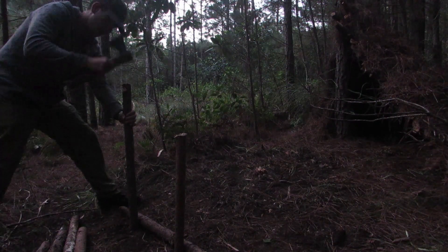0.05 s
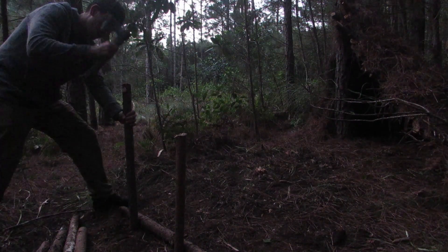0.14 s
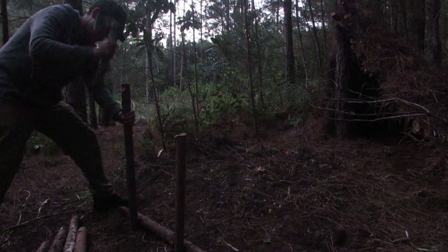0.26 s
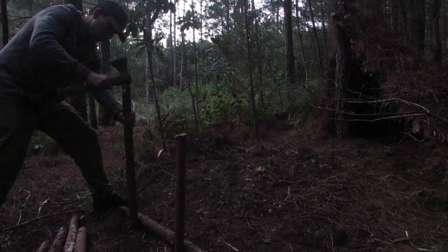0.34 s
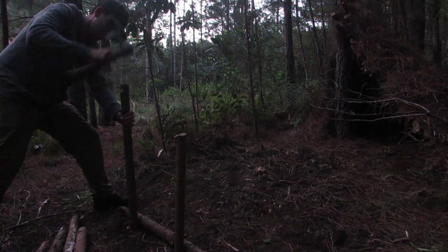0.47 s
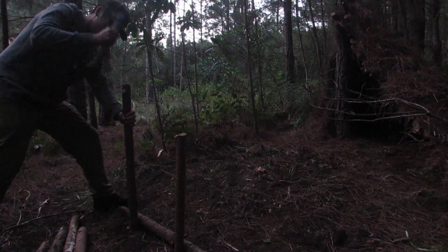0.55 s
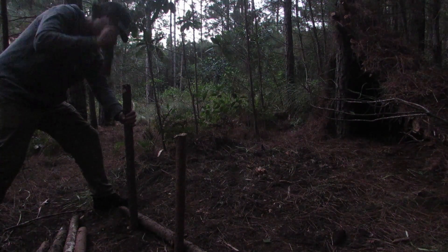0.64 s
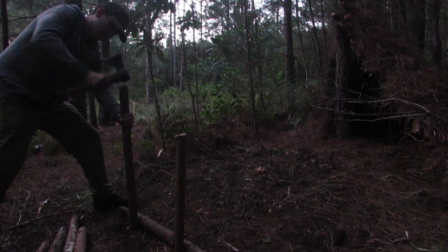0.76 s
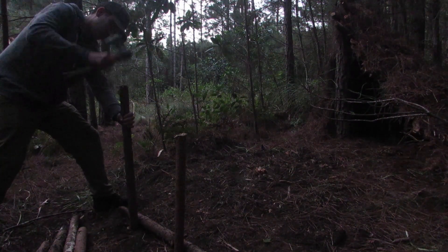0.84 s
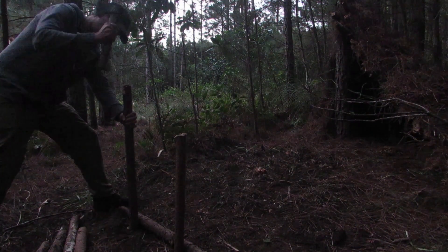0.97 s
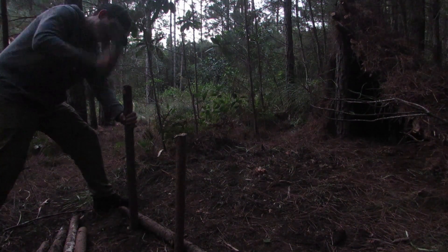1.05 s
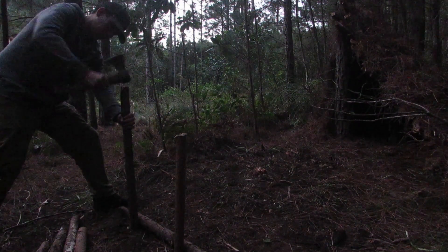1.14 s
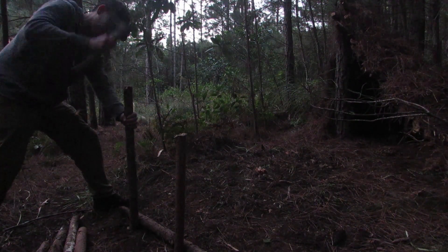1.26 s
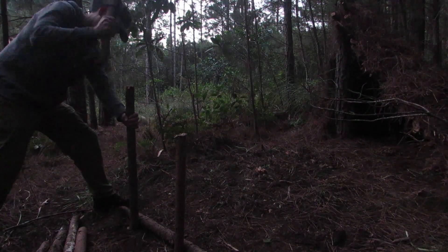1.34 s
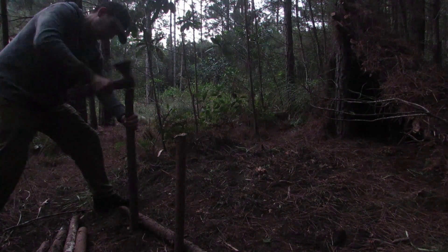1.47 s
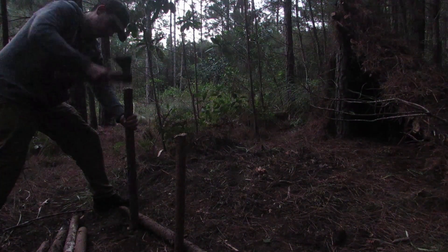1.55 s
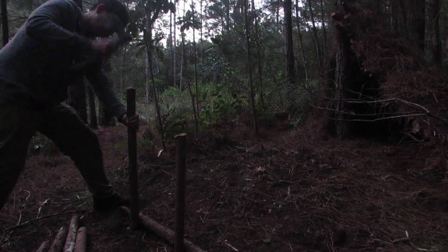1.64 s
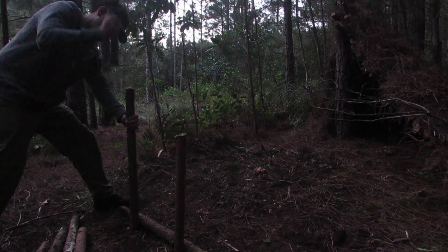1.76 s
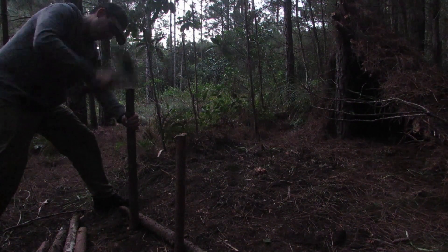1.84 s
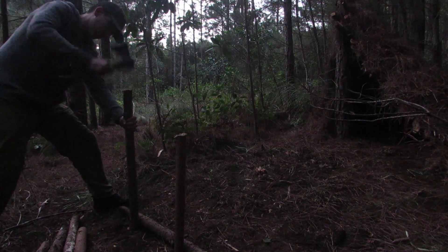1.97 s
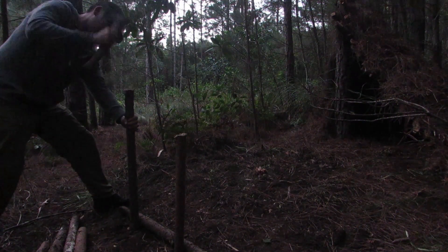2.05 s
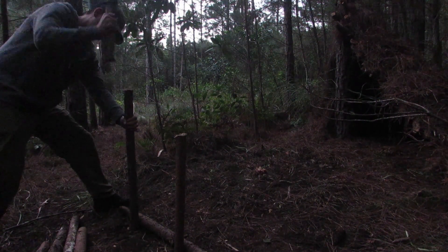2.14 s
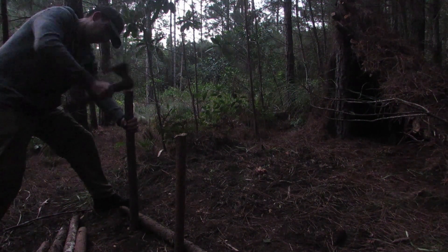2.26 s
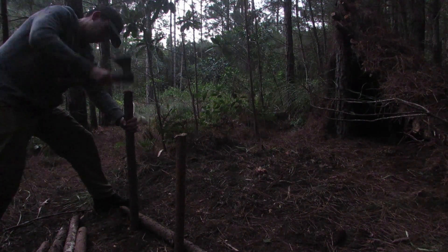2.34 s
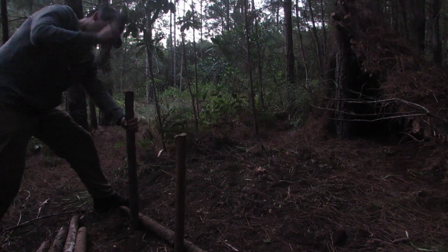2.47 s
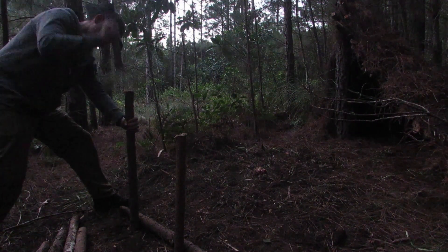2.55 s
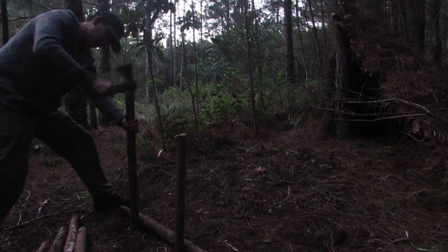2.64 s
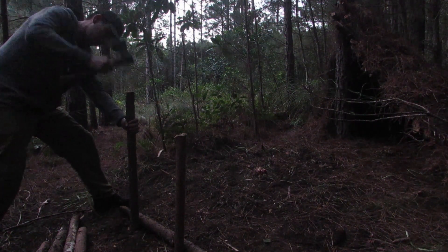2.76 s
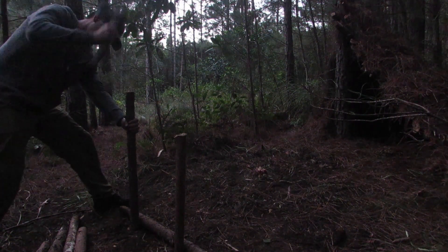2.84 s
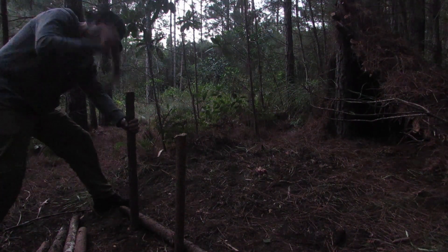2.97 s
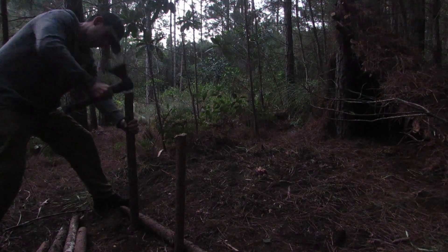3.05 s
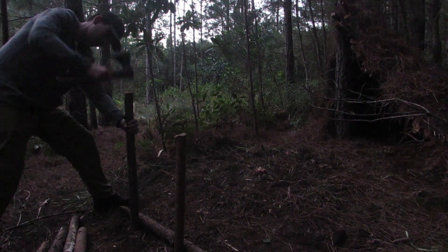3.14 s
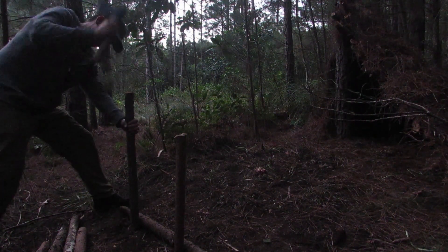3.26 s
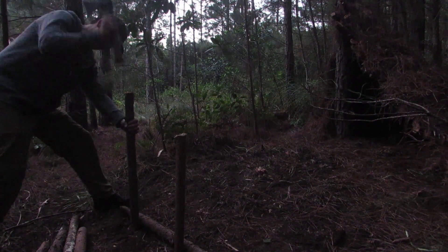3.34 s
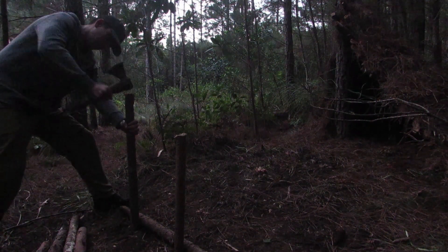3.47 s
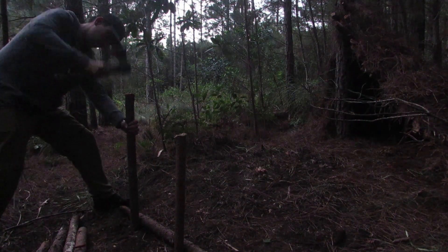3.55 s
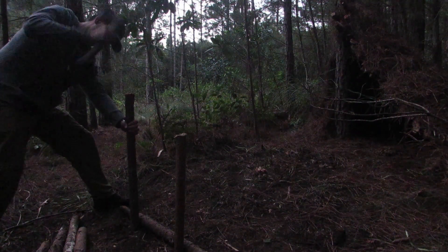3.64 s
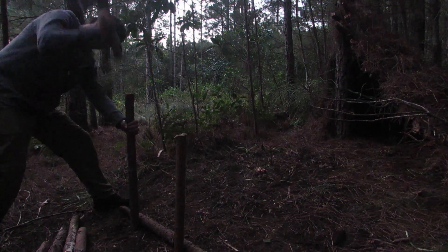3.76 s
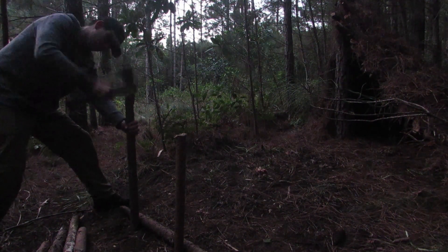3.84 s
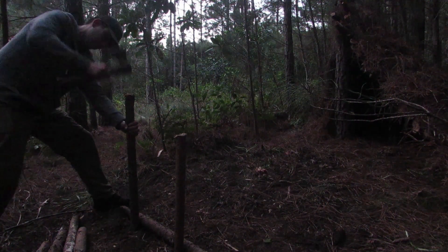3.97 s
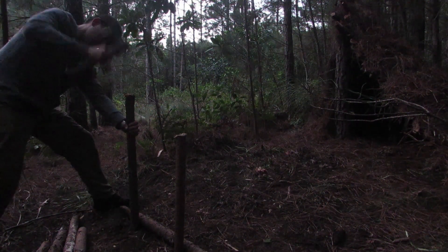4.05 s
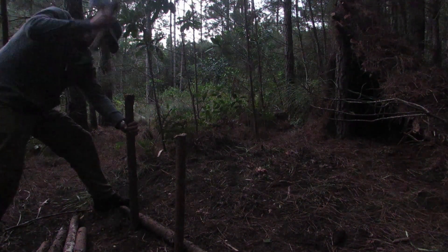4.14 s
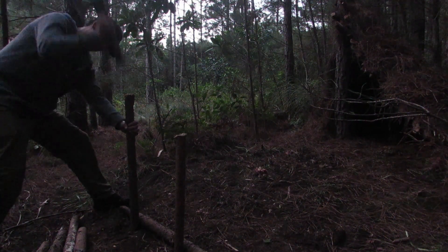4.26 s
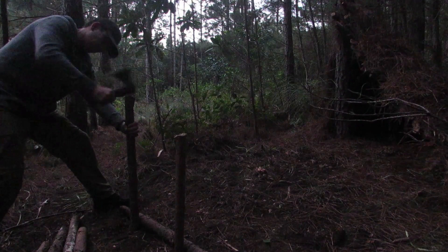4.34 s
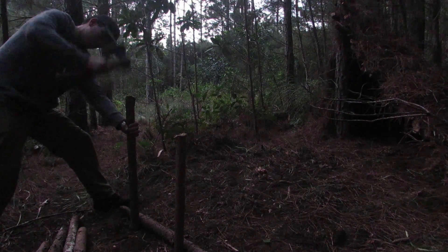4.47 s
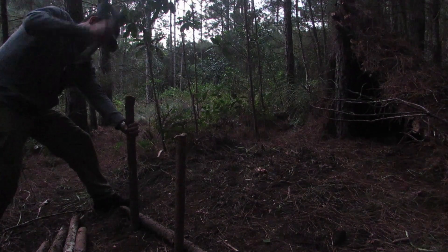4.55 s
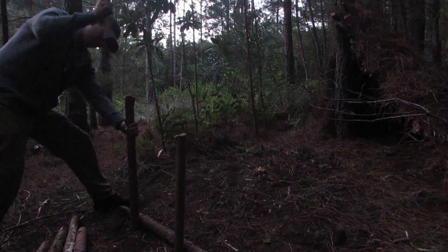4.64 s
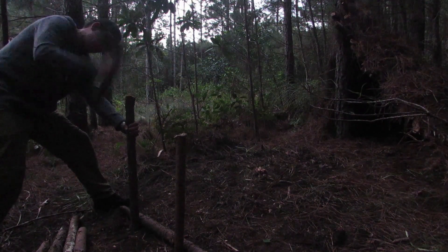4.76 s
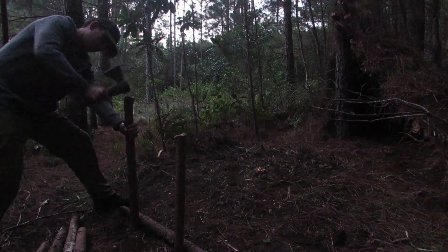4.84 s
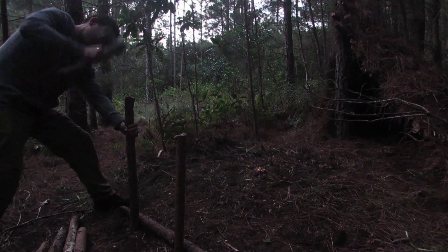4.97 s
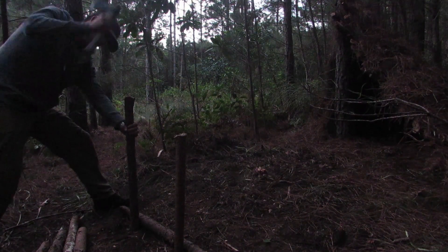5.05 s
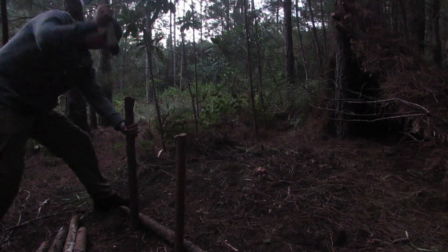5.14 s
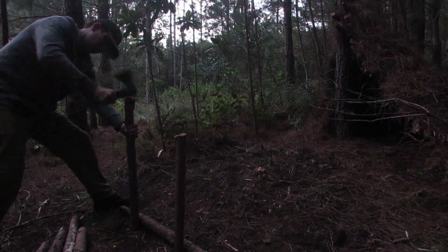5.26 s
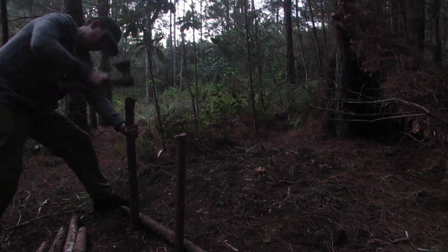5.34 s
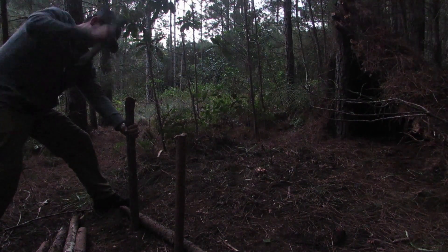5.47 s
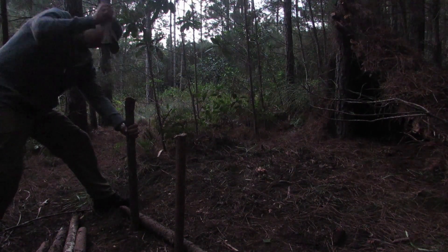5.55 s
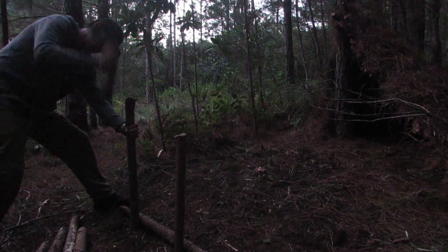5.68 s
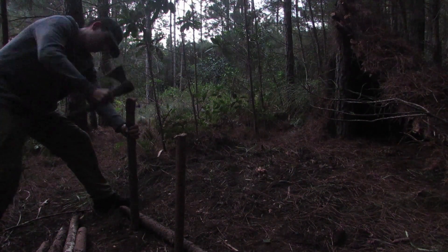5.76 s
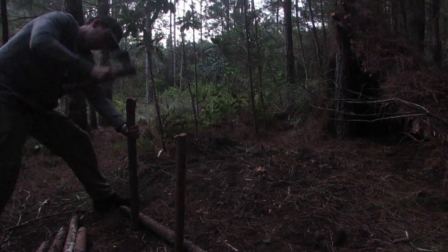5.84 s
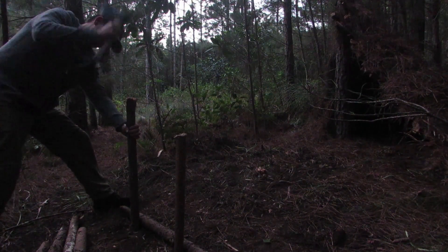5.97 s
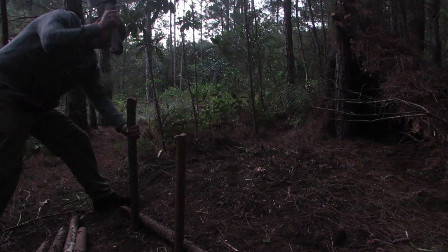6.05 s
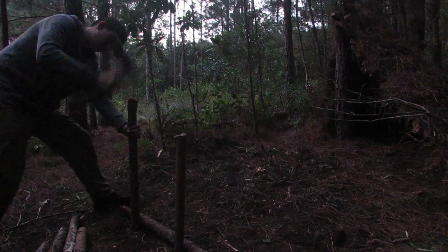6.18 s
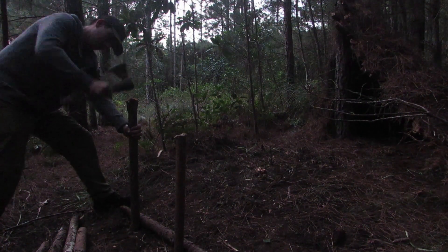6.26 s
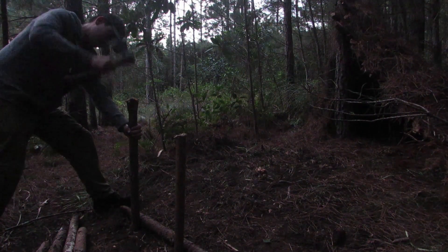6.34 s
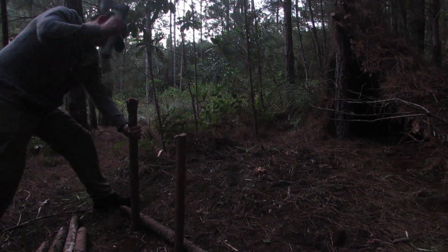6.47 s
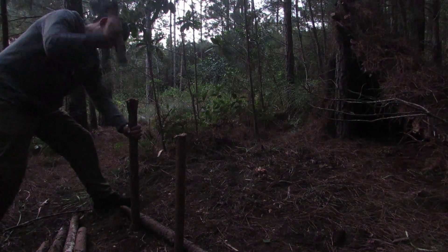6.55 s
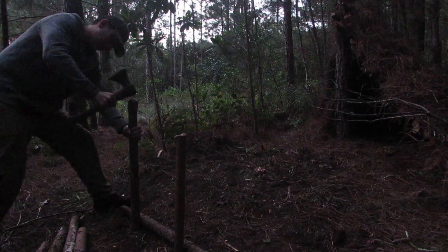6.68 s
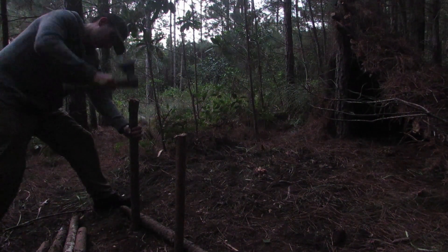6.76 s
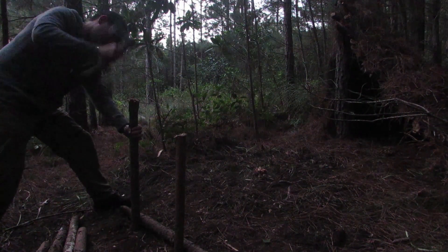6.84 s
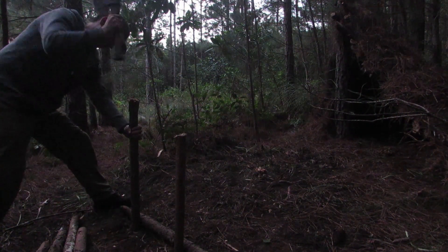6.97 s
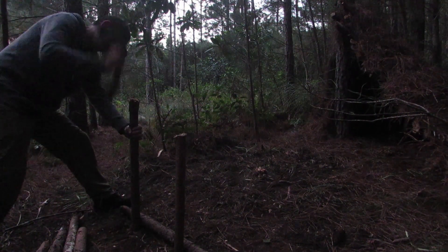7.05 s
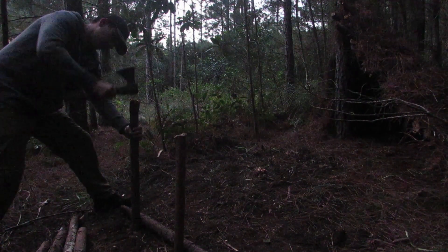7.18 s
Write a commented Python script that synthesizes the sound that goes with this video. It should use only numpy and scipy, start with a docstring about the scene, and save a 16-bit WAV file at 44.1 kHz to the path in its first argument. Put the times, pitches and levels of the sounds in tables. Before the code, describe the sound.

In a quiet forest, a stake is hammered into earth at a steady, slightly slowing pace. Early hits are bright and clacky with crunching wood; later ones are duller, with a firmer, falling thud. Bark snaps, needles crackle faintly, and one tiny bird whistle comes past the middle. A low engine hum and air noise lie behind, with a very faint high electronic whine, heard by a close stereo microphone.

```python
"""Hatchet driving a stake in a forest

A hatchet drives a wooden stake into soil with seventeen blows: crushed-fibre noise, damped wood modes,
a faint head ring, a pitch-falling thud set by the soil's grip and a deep shove that weakens.
Trunks and litter scatter the blows as decaying noise; bark ticks and needles crackle as short noise bursts.
A bird calls once as a wavering sine, over noise for drone and rustle, an engine's firing lines and a thin whine."""
import sys
import numpy as np
from scipy import signal
from scipy.fft import rfft, irfft
from scipy.io import wavfile
from scipy.ndimage import uniform_filter1d

SR = 44100
rng = np.random.default_rng(int(sys.argv[2]) if len(sys.argv) > 2 else 0)


def master(y):
    """Save y as 16-bit WAV."""
    cut = np.clip(np.atleast_2d(y).T, -1, 1)
    pcm = np.round(cut * 32767)  # scale
    wavfile.write(sys.argv[1], SR, pcm.astype(np.int16))


N = 317961
TIME = np.arange(N) / SR
BLOW_TIME = np.arange(8192) / SR
LEVEL_SPAN_S = 0.01


def amp(db):
    """Decibels to gain."""
    return 10 ** (np.asarray(db) / 20)


def evened(x):
    """Scales to rms 1."""
    return x / np.sqrt(np.mean(x ** 2) + 1e-20)


def burst(x, db):
    """Scales a short sound so that its energy, spread over LEVEL_SPAN_S, has this level."""
    return amp(db) * x * np.sqrt(LEVEL_SPAN_S * SR / (np.sum(x ** 2) + 1e-20))


def read(points, hz):
    """Interpolates a (frequency, value) table on a log-frequency axis."""
    f, value = np.transpose(points)
    return np.interp(np.log(hz + 1), np.log(f + 1), value)


def add(mix, start_s, sound):
    """Mixes a sound in at start_s, cut at the end of the mix."""
    part = mix[..., max(round(start_s * SR), 0):][..., :sound.shape[-1]]
    part += sound[..., :part.shape[-1]]


def noise(spectrum, size):
    """Gaussian noise of rms 1, shaped by a (frequency, dB) table."""
    shape = amp(read(spectrum, np.fft.rfftfreq(size, 1 / SR)))
    white = rfft(rng.standard_normal(size))
    return evened(irfft(white * shape, size))


def drift(rate_hz):
    """Smooth random drift of rms 1: noise under a Gaussian low-pass."""
    lowpass = np.exp(-(np.fft.rfftfreq(N, 1 / SR) / rate_hz) ** 2)
    return evened(irfft(rfft(rng.standard_normal(N)) * lowpass, N))


# background before trim: (time [s], drone level [dB], rustle level [dB])
BACKGROUND_LEVELS = [(0.0, -45.5, -59.5), (0.48, -50, -69.5), (1.84, -57.5, -74.5), (2.04, -60.5, -80),
                     (3.49, -62, -84.5), (4.39, -61.5, -80), (4.61, -62.5, -85.5), (6.42, -58.5, -76),
                     (7.2, -62, -83)]
# noise shapes: (frequency [Hz], relative level [dB per Hz])
DRONE_SPECTRUM = [(20, -22), (45, -4), (70, 3.5), (140, 9), (230, -2), (380, -1), (650, -1), (1000, -7.5),
                  (1600, -18), (2500, -27.5), (4500, -38), (9000, -52)]
RUSTLE_SPECTRUM = [(500, -12), (2500, -6.5), (5000, -4), (9500, -4), (13000, -7.5), (16000, -16)]


def air(drone_trim_db=2.5, rustle_trim_db=1):
    """Far drone and needles rustling in the air: two shaped noises with drifting levels."""
    s, drone_level, rustle_level = np.transpose(BACKGROUND_LEVELS)
    drone_db = drone_trim_db + np.interp(TIME, s, drone_level) + 0.35 * drift(rate_hz=12)
    rustle_db = rustle_trim_db + np.interp(TIME, s, rustle_level) + drift(rate_hz=40)
    drone = amp(drone_db) * noise(DRONE_SPECTRUM, size=N)
    rustle = amp(rustle_db) * noise(RUSTLE_SPECTRUM, size=N)
    return drone + rustle


# engine before trim: (time [s], level [dB])
ENGINE_LEVELS = [(0.0, -41.5), (1.0, -48.5), (1.24, -60.5), (1.76, -56), (1.86, -58.5), (3.85, -54),
                 (4.61, -61), (6.28, -51.5), (7.2, -53)]
# firing lines before wander: (frequency [Hz], relative level [dB])
FIRING_LINES = [(70.3, -5.5), (140.6, 0), (307, -16.5), (380, -14)]


def engine(trim_db=-1, wander=0.0051):
    """A far engine: firing lines share a wandering speed; each drifts in level."""
    clock = np.cumsum(1 + wander * drift(rate_hz=5.4)) / SR
    lines = [amp(db + drift(rate_hz=4)) * np.sin(2 * np.pi * hz * clock) for hz, db in FIRING_LINES]
    return evened(sum(lines)) * amp(trim_db + np.interp(TIME, *np.transpose(ENGINE_LEVELS)))


def whine(whine_hz=15735, above_rustle_db=-13, follow=0.7, beat_hz=17):
    """Camera electronics: a faint beating sine whose level partly follows the rustle table."""
    s, _, rustle_level = np.transpose(BACKGROUND_LEVELS)
    change_db = np.interp(TIME, s, rustle_level - rustle_level[0])
    level_db = rustle_level[0] + above_rustle_db + follow * change_db
    beat = 1 + 0.5 * np.sin(2 * np.pi * beat_hz * TIME)
    return amp(level_db) * beat * np.sin(2 * np.pi * whine_hz * TIME)


def litter(max_peak_db=-60, peak_span_db=8, middle_hz=8000, count=20):
    """Dry needles crackle faintly: ticks of random time, peak and pitch."""
    out = np.zeros(N)
    for when, size, pitch in rng.random((count, 3)):
        sound = tick(max_peak_db - peak_span_db * size, middle_hz * 2 ** (pitch - 0.5))
        add(out, when * N / SR, sound)
    return out


# crushed fibres: (frequency [Hz], relative level [dB])
CRACK_SPECTRUM = [(1500, -28.5), (2500, 7.5), (3600, 4), (5200, -0.5), (6500, -16), (9000, -40)]
CRUNCH_SPECTRUM = [(3500, -36.5), (6000, 0.5), (9000, -3.5), (11500, -6.5), (15000, -16), (17000, -24)]


def fibres(spectrum, full_force_s, decay_s, grain=0.13):
    """Fibres crush as grainy noise: fast onset, slow fall, then a steeper one before full force."""
    t = BLOW_TIME
    grains = np.exp(grain * rng.standard_normal(len(t)))
    onset = 1 - np.exp(-t / 0.0003)
    fall = np.exp(-t / 0.013 - np.maximum(t - full_force_s * 0.24, 0) / decay_s)
    return noise(spectrum, size=len(t)) * grains * onset * fall


def swell(t, rise_s):
    """Heavily damped resonance under a soft push: starts at -rise_s, peaks at 1 at t = 0."""
    u = np.maximum(t / rise_s + 1, 0)
    return u ** 2 * np.exp(2 * (1 - u))


def wood(t, hz, rise_s):
    """One damped stake mode, its envelope peaking at t = 0."""
    return -swell(t, rise_s) * np.sin(2 * np.pi * hz * t)


def pushed(hz, rise_s, full_force_s, touch_db, touch_rise_s=0.00016, touch_s=0.0007):
    """A stake mode is struck twice: at first touch, then with the head's full weight."""
    touch = wood(BLOW_TIME - touch_s, hz, touch_rise_s)
    return wood(BLOW_TIME - full_force_s, hz, rise_s) + amp(touch_db) * touch


# short bending modes: (ratio to body pitch [1], swell time [s], relative level [dB])
BODY_MODES = [(0.779, 0.002, 5.5), (1.3, 0.0022, 4)]


def stake_body(body_hz, full_force_s, grip_db):
    """Bending modes of the stake; a loose stake already moves at first touch."""
    touch_db = -12 - 2.1 * grip_db
    return sum(amp(db) * pushed(body_hz * ratio, rise_s, full_force_s, touch_db, touch_rise_s=0.00049)
               for ratio, rise_s, db in BODY_MODES)


def stake_knock(s, full_force_s, touch_db, start_hz=1008, rise_per_s=0.017):
    """Knock mode; its pitch rises as the free length shortens."""
    return pushed(start_hz * (1 + rise_per_s * s), 0.0013, full_force_s, touch_db)


def stake_clack(clack_hz, full_force_s, touch_db):
    """Two highest wood modes, the upper one weaker."""
    upper = pushed(clack_hz * 1.35, 0.00088, full_force_s, touch_db)
    return pushed(clack_hz, 0.0009, full_force_s, touch_db) + amp(-15.5) * upper


# hatchet-head modes: (frequency [Hz], peak against clack level [dB], t60 [s])
HEAD_MODES = [(1952, -16.5, 0.1), (3120, -37, 0.13), (5980, -39.5, .07)]


def head_ring():
    """The steel head rings faintly in exponentially decaying sines."""
    return sum(amp(db - 60 * BLOW_TIME / t60_s) * np.sin(2 * np.pi * hz * BLOW_TIME)
               for hz, db, t60_s in HEAD_MODES)


def thud(flex_db, start_hz=280, end_hz=75, glide_s=0.0078, rise_s=0.0079, flex_hz=250, flex_rise_s=0.0073):
    """The stake flexes in soil: fast bending waves arrive first, so pitch falls; a flex mode rings on top."""
    hz = end_hz + (start_hz - end_hz) * np.exp(-BLOW_TIME / glide_s)
    cycles = np.cumsum(hz) / SR - 0.15
    soil = -swell(BLOW_TIME - rise_s, rise_s) * np.sin(2 * np.pi * cycles)
    flex = swell(BLOW_TIME - 0.61 * flex_rise_s, flex_rise_s) * np.sin(2 * np.pi * flex_hz * BLOW_TIME)
    return soil + amp(flex_db) * flex


def shove(hz=80, trough_s=0.015, rise_s=0.011):
    """The soil gives way and stops the stake: one slow, deep push."""
    return -swell(BLOW_TIME - rise_s, rise_s) * np.cos(2 * np.pi * hz * (BLOW_TIME - trough_s))


# soil's hold, as thud gain: (time [s], level [dB])
SOIL_GRIP = [(.39, -2.5), (.77, -4.5), (1.9, -7), (3.09, -2.5), (4.35, 0), (5.27, 4), (6.22, 6), (7.12, 4)]


def grip(s):
    """The soil's hold on the stake at time s, in dB."""
    return np.interp(s, *np.transpose(SOIL_GRIP))


# base part levels, offset per blow
THUD_DB, BODY_DB, KNOCK_DB, CLACK_DB, CRACK_DB, CRUNCH_DB = -20, -21, -20, -23, -31, -33
SHOVE_START_DB, SHOVE_DB_PER_S = -30.5, -1.23


def blow(s, full_force_s, body_hz, knock_db, clack_db, clack_hz, crack_db, crunch_db):
    """Steel meets end grain: fibres crush, stake and head ring, soil thuds and gives way."""
    grip_db = grip(s)
    touch_db = -8.5 + 0.15 * crunch_db  # more crushed fibres, harder first touch
    body_db = BODY_DB + 0.29 * knock_db - 0.42 * grip_db  # body follows knock, yields to thud
    flex_db = -9 + 0.35 * grip_db  # firmer grip, more flex
    stake = burst(stake_body(body_hz, full_force_s, grip_db), body_db)
    stake += burst(stake_knock(s, full_force_s, touch_db), KNOCK_DB + knock_db)
    stake += burst(stake_clack(clack_hz, full_force_s, touch_db), CLACK_DB + clack_db)
    head = amp(CLACK_DB + clack_db) * head_ring()
    crack = burst(fibres(CRACK_SPECTRUM, full_force_s, decay_s=0.0028), CRACK_DB + crack_db)
    crunch = burst(fibres(CRUNCH_SPECTRUM, full_force_s, decay_s=0.0011), CRUNCH_DB + crunch_db)
    soil = burst(thud(flex_db), THUD_DB + grip_db)
    soil += burst(shove(), SHOVE_START_DB + SHOVE_DB_PER_S * s)  # deeper stake slides less
    return stake + head + crack + crunch + soil


def broad_colour(sound, hz):
    """Amplitude spectrum of a short sound, fine ripples blurred away."""
    power = abs(rfft(sound)) ** 2
    octaves = np.log2((np.fft.rfftfreq(len(sound), 1 / SR) + 30) / (hz[:, None] + 30))
    blur = np.exp(-(octaves / 0.2) ** 2)
    return np.sqrt(blur @ power / blur.sum(1))


# scatter from litter and trunks: (frequency [Hz], relative level [dB])
SCATTER_SPECTRUM = [(60, -4.5), (150, 5.5), (400, -13), (1000, -8), (2000, -4), (3500, -1.5), (6000, 1.5),
                    (9000, 9), (12000, 4.5), (16000, 1.5)]
# decay before spreading loss: (frequency [Hz], t60 [s])
SCATTER_DECAY = [(100, .5), (1000, 0.85), (2300, 3), (4000, 1.4), (8000, 0.2), (15000, .4)]


def forest(colour, hz, onset_s=0.0023, near_s=0.0098, thinning=1.154, patchy_db=2.0):
    """Litter and trunks scatter a sound into a (mid, side) noise wash of its colour, decaying per band."""
    _, when, z = signal.stft(rng.standard_normal((2, SR)), SR, nperseg=512)
    decay_db = 60 * when / read(SCATTER_DECAY, hz)[:, None]
    z = z * colour[:, None] * amp(read(SCATTER_SPECTRUM, hz)[:, None] - decay_db)
    clumps = uniform_filter1d(rng.standard_normal(z.shape), size=7, axis=1)
    clumps = uniform_filter1d(clumps, size=14, axis=2)
    z = z * amp(patchy_db * evened(clumps))  # trunks stand unevenly
    t = np.arange(SR) / SR
    spread = (t > onset_s) / (1 + t / near_s) ** thinning  # later echoes: farther trees
    wash = signal.istft(z, SR, nperseg=512)[1][:, :SR]
    return wash * spread / np.linalg.norm(spread)


def tick(peak_db, hz, rise_s=0.00082, decay_s=0.0021):
    """A dry snap: a short noise burst, broad around its own pitch."""
    t = BLOW_TIME
    spectrum = [(hz / 5, -30), (hz / 2, -6), (hz, 0), (hz * 2, -7), (hz * 4, -24)]
    snap = noise(spectrum, size=len(t)) * (1 - np.exp(-t / rise_s)) * np.exp(-t / decay_s)
    return amp(peak_db) * snap / abs(snap).max()


# bird call before waver: (time [s], pitch [Hz], level [dB])
BIRD_CALL = [(4.129, 7450, -82.5), (4.17, 6620, -86.5), (4.22, 6300, -77), (4.28, 6630, -85.5),
             (4.34, 6750, -72), (4.36, 6940, -102)]


def bird(waver=0.025):
    """One high, fuzzy, far whistle: a gliding sine with fast random pitch waver."""
    s, hz, db = np.transpose(BIRD_CALL)
    pitch_hz = np.interp(TIME, s, hz) * (1 + waver * drift(rate_hz=480))
    gate = (TIME > s[0]) * (TIME < s[-1])
    return amp(np.interp(TIME, s, db)) * gate * np.sin(2 * np.pi * np.cumsum(pitch_hz) / SR)


# left against right: (frequency [Hz], level difference [dB])
PORT_LEVELS = [(100, 0), (380, -1.1), (620, -1.2), (1200, .9), (1900, 1.5), (4000, 0), (7300, 1.4),
               (13500, -2)]
# left's lead: (frequency [Hz], phase [rad])
PORT_LEADS = [(100, 0), (350, -.03), (1100, .23), (2500, .08), (4500, .25), (6200, .45), (10000, .15),
              (14500, .6)]
# side signal: (frequency [Hz], gain [dB])
SIDE_WIDTH = [(60, -34.5), (120, -37), (200, -13.5), (380, -7.5), (1300, -8), (4400, -7), (8000, -13),
              (15000, -13)]


def ports(mid, side):
    """Two close microphone ports: small level and phase shifts, plus the part that differs."""
    hz = np.fft.rfftfreq(N, 1 / SR)
    left = amp(read(PORT_LEVELS, hz) / 2) * np.exp(1j * read(PORT_LEADS, hz) / 2)
    apart = rfft(side) * amp(read(SIDE_WIDTH, hz))
    return irfft(rfft(mid) * np.array([left, 1 / left]) + np.array([apart, -apart]), N)


# blows, levels as offsets: (start [s], start to full force [s], body pitch [Hz], knock [dB], clack [dB],
# clack pitch [Hz], crack [dB], crunch [dB])
STAKE_BLOWS = [(.394, 0.002, 419.3, 7.5, 5.5, 1696, 1.5, 1.5), (.77, .0021, 450, -3.5, 5.5, 1772, -3.5, 8),
               (1.14, .0026, 490, 1.5, 3.5, 1653, 5.5, 12), (1.5168, .003, 531, -1.5, 3.5, 1644, 7, 5),
               (1.9086, .0028, 462, 8.5, 2, 1654, 3.5, 3), (2.3042, .0026, 514, 3.5, 3, 2058, 2, -5),
               (2.691, .0026, 490, 5, -4, 2040, 1, -3), (3.0885, .0025, 550, 1.5, 1, 1752, 3.5, 1.5),
               (3.4869, .0027, 490, -8.5, -4, 1827, -1.5, -2), (3.9055, .0024, 539, -2, -0.5, 1809, 4, -4),
               (4.3522, .0024, 630, -1.5, 2, 1696, -2, 0.5), (4.8084, 0.0026, 538, -5.5, -4, 1653, 0, -4.5),
               (5.27, .0026, 578, -4.5, -7, 1731, -0.5, -2), (5.7409, .0024, 650, 2.5, -5, 1719, -5.5, -3),
               (6.2162, .0025, 436, -8, -2.5, 1900, 0, 1), (6.6693, 0.0025, 572, 1.5, 2.5, 1709, -4.5, -2),
               (7.1194, .0026, 523, 3.5, -4, 1910, 0, -7.5)]
# bits of bark and twigs: (time [s], peak [dB], centre [Hz])
BARK_TICKS = [(0.431, -33, 8150), (0.4613, -42, 8240), (0.951, -45.5, 4660), (1.229, -32, 7000),
              (1.381, -52.5, 8630), (1.5995, -26.5, 4114), (3.5416, -39.5, 7670), (3.6883, -56, 5400),
              (3.7626, -52, 8400), (4.599, -45, 3280), (5.7079, -39.5, 4870)]


def scene(tick_echo_db=-10, own_share=0.7, echo_side_db=-6):
    """Blows and ticks with their forest echo, over the background."""
    hz = np.fft.rfftfreq(512, 1 / SR)
    near, echo = np.zeros(N), np.zeros((2, N))
    sounds = [blow(*row) for row in STAKE_BLOWS]
    colours = np.array([broad_colour(sound, hz) for sound in sounds])
    usual = np.exp(np.log(colours).mean(0))
    for (s, _, _, knock_db, *_), sound, colour in zip(STAKE_BLOWS, sounds, colours):
        add(near, s, sound)
        echo_db = -12.5 - 0.3 * knock_db - 0.072 * grip(s)  # echoes vary less than blows
        # trees hear the stake from every side, so echo colours are more alike
        echo_colour = usual * (colour / usual) ** own_share
        add(echo, s, forest(amp(echo_db) * echo_colour, hz))
    for s, peak_db, centre_hz in BARK_TICKS:
        sound = tick(peak_db, centre_hz)
        add(near, s, sound)
        add(echo, s, amp(tick_echo_db) * forest(broad_colour(sound, hz), hz))
    mid = air() + engine() + whine() + litter() + near + echo[0] + bird()
    return ports(mid, amp(echo_side_db) * echo[1] + air())


def record(dry, low_cut_hz=50, edge_hz=16150):
    """Microphone bass roll-off, clipping at full scale, then a low-pass band limit."""
    high_pass = signal.butter(1, low_cut_hz, "high", fs=SR, output="sos")
    clipped = np.clip(signal.sosfilt(high_pass, dry), -1, 1)
    band_limit = signal.firwin(255, edge_hz, window=("kaiser", 9), fs=SR)
    return signal.oaconvolve(clipped, band_limit[None], "same")


dry = scene()
out = record(dry)
master(out)
```